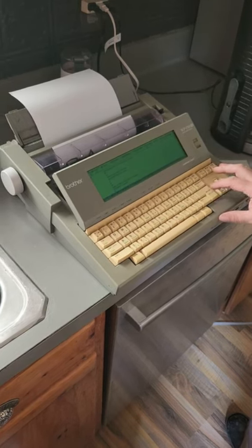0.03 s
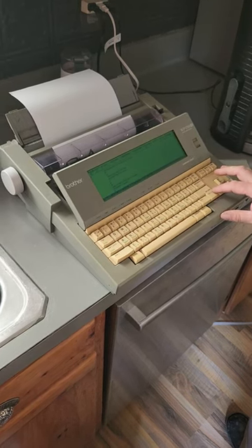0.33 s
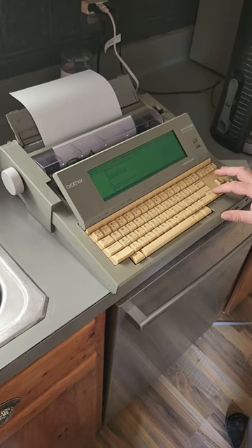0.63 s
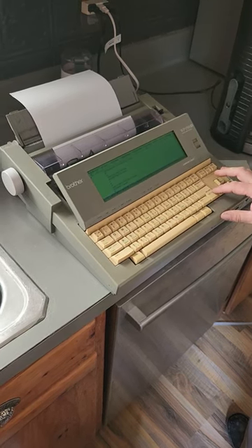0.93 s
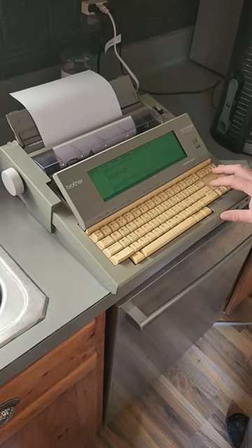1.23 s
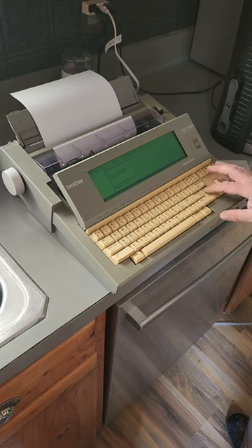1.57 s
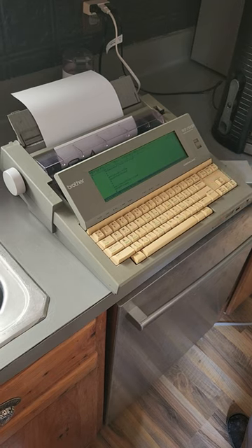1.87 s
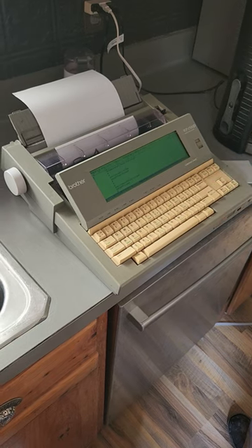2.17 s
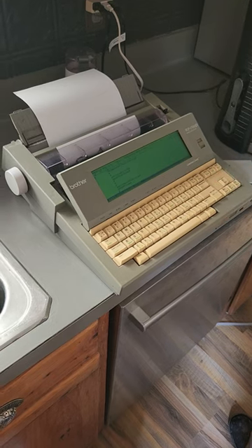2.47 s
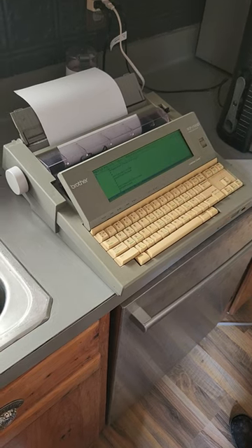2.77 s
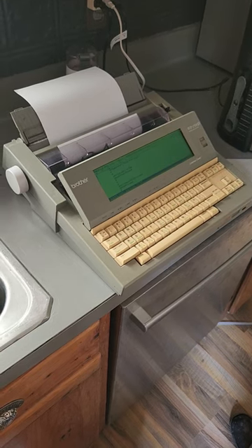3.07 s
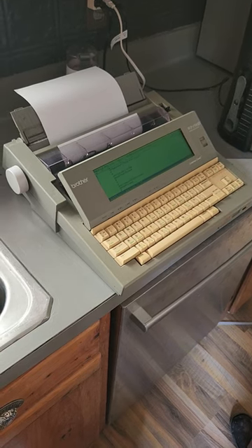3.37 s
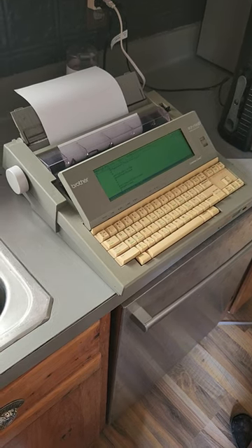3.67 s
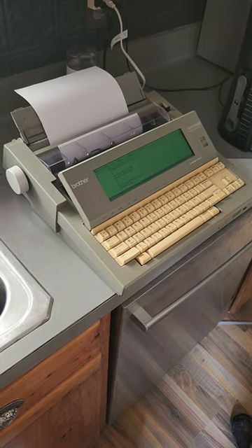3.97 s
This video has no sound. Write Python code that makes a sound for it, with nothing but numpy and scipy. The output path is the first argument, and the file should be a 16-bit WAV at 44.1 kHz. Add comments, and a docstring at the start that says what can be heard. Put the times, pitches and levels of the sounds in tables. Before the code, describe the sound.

An electronic typewriter hums quietly, then engages with a loud clunk and prints a quick run of letters, each clack mixed with small rasps and motor whirs. It is heard close by in a quiet kitchen.

```python
"""Electronic typewriter on a kitchen counter

The machine hums, clunks into action and prints about eight letters a second. The ribbon advances
with a double rasp, the hammer strikes type and roller, the type wheel whirs, and a stepper motor
moves the carriage to its next stop. Blows are decaying noise and resonant modes; rasps are runs of
tiny contacts. The small hard room adds a short tail."""
import sys
import numpy as np
from scipy import signal
from scipy.fft import rfft, irfft
from scipy.io import wavfile
from scipy.ndimage import uniform_filter1d

SR = 44100
rng = np.random.default_rng(int(sys.argv[2]) if len(sys.argv) > 2 else 0)


def bounce(signal):
    """Save signal as a 16-bit WAV file at the path given by the first command-line argument."""
    frames = np.transpose(np.atleast_2d(signal))
    limited = np.clip(frames, -1, 1)
    pcm = np.round(limited * 32767).astype(np.int16)
    wavfile.write(sys.argv[1], SR, pcm)


N = 176400

# Each row: strike in seconds, then hammer, carriage motor and carriage stop levels in relative dB.
LETTERS = [(1.7686, -35.5, -37, -43), (1.952, -36, -33, -38.5), (2.048, -38.5, -33, -40.5),
           (2.153, -38.5, -34, -40), (2.2655, -38, -34, -42), (2.3741, -37.5, -35, -39.5),
           (2.4715, -38.5, -34.5, -49), (2.5763, -36.5, -36, -39.5), (2.7127, -36.5, -34, -44),
           (2.81, -36.5, -35, -38.5), (2.9371, -37.5, -34.5, -39.5), (3.1157, -36.5, -35.5, -38.5),
           (3.251, -37, -35, -37.5), (3.3477, -36.5, -35, -36), (3.445, -37.5, -33.5, -37.5),
           (3.557, -37.5, -37, -38.5), (3.7167, -37.5, -37.5, -40.5), (3.8282, -36.5, -36, -46),
           (3.9446, -37, -35, -35.5)]
# Blows as the mechanism engages, then two dull carriage knocks just after the first letter.
# Each row: start in seconds, level in relative dB, dull knock in dB against the blow.
CLUNKS = [(1.5701, -32.5, -7), (1.5754, -18, -17.5), (1.5795, -22.5, -11), (1.6635, -31.5, 0.5),
          (1.671, -34.5, -1.5), (1.79, -54, 10), (1.799, -45.5, 5)]
# Stereo width. Each row: frequency in Hz, side against middle in dB.
WIDTH = [(50, -21.5), (130, -15.5), (250, -13.5), (440, -9), (700, 1.5), (1300, 0)]


def amp(db):
    return 10 ** (np.asarray(db) / 20)


def unit_rms(x):
    return x / np.sqrt(np.mean(x ** 2) + 1e-20)


def curve_at(points, hz):
    f, value = np.transpose(points)
    return np.interp(np.log(hz + 1), np.log(f), value)


def decay(t, t60_s):
    return np.exp(-np.log(1000) * t / t60_s)


def add(mix, start_s, sound):
    part = mix[:, max(round(start_s * SR), 0):][:, :sound.shape[1]]
    part += sound[:, :part.shape[1]]


def blow(x):
    """Scales a middle/side pair to the energy of 10 ms at level 1."""
    return x / np.sqrt(np.sum(x ** 2) / 2 / (SR / 100) + 1e-20)


def colour(x, spectrum, size=16384, smooth_bins=25):
    """Minimum-phase shaping of a middle/side pair. Each spectrum row: frequency in Hz, level in dB."""
    z, hz = rfft(x, size), np.fft.rfftfreq(size, 1 / SR)
    power = abs(uniform_filter1d(abs(z) ** 2, 2 * smooth_bins + 1))
    gain = amp(curve_at(spectrum, hz)) / np.sqrt(power + 1e-12)
    gain[1] *= amp(curve_at(WIDTH, hz))
    cepstrum = irfft(np.log(gain))
    cepstrum[:, 1:size // 2] *= 2
    cepstrum[:, size // 2 + 1:] = 0
    return irfft(z * np.exp(rfft(cepstrum)))


def decaying_noise(t60_curve, size):
    """Dense ring, each band dying at its own rate."""
    hz, t, z = signal.stft(rng.standard_normal((2, size)), SR, nperseg=128)
    z = z * decay(t, curve_at(t60_curve, hz)[:, None])
    return signal.istft(z, SR, nperseg=128)[1][:, :size]


def ring(spectrum, t60_scale=1, crack=0, size=8192):
    """One blow on a part: a dense ring with an optional opening crack."""
    # Damping of the parts. Each row: frequency in Hz, base T60 in seconds.
    body_t60 = [(200, 0.11), (600, 0.1), (1800, 0.099), (4500, 0.08), (12000, 0.041)]
    t = np.arange(size) / SR
    noise = decaying_noise([(hz, t60_s * t60_scale) for hz, t60_s in body_t60], size)
    return blow(colour(noise * (1 + crack * np.exp(-t / .0003)), spectrum))


def modes(table, size=16384):
    """Clear resonances of a part. Each row: frequency in Hz, relative dB, T60 in seconds."""
    out, t = np.zeros((2, size)), np.arange(size) / SR
    for hz, db, t60_s in table:
        gain = amp(db) * amp([[0], [curve_at(WIDTH, hz)]])
        envelope = np.minimum(2 * hz * t, 1) * decay(t, t60_s)
        out += gain * envelope * np.sin(2 * np.pi * (hz * t + rng.random((2, 1))))
    return blow(out)


def chatter(envelope, spread_db):
    """Tiny uneven contacts: noise whose level jumps every 16 samples."""
    size = len(envelope)
    noise = rng.standard_normal((2, size))
    grit_db = spread_db * rng.standard_normal(size // 16 + 1).repeat(16)[:size]
    return envelope * noise * amp(grit_db)


def hum():
    """Transformer and motor lines and thin whines waver over a soft hiss; one line swells."""
    # Hum and whine lines. Each row: frequency in Hz, level in dB.
    lines = [(48.6, -49), (120, -52.5), (124.5, -58), (148.2, -55.5), (240, -58), (254, -58.5),
             (360, -57.5), (480, -60), (569.1, -64.5), (600, -66), (808.8, -66), (1080, -69.5),
             (1259, -66.5), (3058, -80.5), (3661, -83), (4560, -79.5), (10977, -89)]
    # Room and machine hiss. Each row: frequency in Hz, density in relative dB.
    hiss_spectrum = [(22, -21), (42, 1.5), (78, -10.5), (125, -3.5), (195, -16), (260, -12.5), (390, -11.5),
                     (520, -17), (950, -22.5), (1250, -23.5), (1700, -27), (2200, -29), (2650, -40),
                     (4200, -38.5), (4600, -47.5), (5200, -45), (7200, -44.5), (8150, -38), (9200, -48),
                     (10000, -73), (12000, -59), (16000, -61)]
    t, bins_hz = np.arange(N) / SR, np.fft.rfftfreq(N, 1 / SR)
    swell_hz, swell_db = 1141, np.interp(t, [0, .9, 1.4, 1.7], [-75, -71, -61, -65])
    noise = rfft(rng.standard_normal((2, N)))
    noise[1] *= amp(curve_at(WIDTH, bins_hz))
    out = amp(-51.5) * unit_rms(irfft(noise * amp(curve_at(hiss_spectrum, bins_hz)), N))
    for hz, db in lines + [(swell_hz, swell_db)]:
        knots = rng.standard_normal((2, 40)) + 1j * rng.standard_normal((2, 40))
        waver = 1 + .21 * signal.resample(knots, N, axis=1)
        tone = waver * np.exp(2j * np.pi * (hz * t + rng.random()))
        spread = np.array([[1], [1j * amp(curve_at(WIDTH, hz))]])
        out += np.sqrt(2) * amp(db) * (spread * tone).real
    return out


def kitchen(x):
    """Hard walls return a short diffuse tail, narrow in the bass."""
    # Room decay. Each row: frequency in Hz, T60 in seconds.
    room_t60 = [(100, 1), (500, 1), (2000, 0.69), (6000, 0.52), (15000, 0.21)]
    size, build_s = 16384, .0045
    tail = decaying_noise(room_t60, size) * np.minimum(np.arange(size) / SR / build_s, 1)
    tail = colour(tail, [(250, -9), (500, -2.5), (1500, -1), (5000, -5), (15000, -4.5)])
    return signal.fftconvolve(x[:1], tail / np.linalg.norm(tail[0]), axes=1)[:, :N]


def slides():
    """Sliding parts: a rattle that swells and fades."""
    # Each row: start, rise and fall in seconds, level in dB.
    moves = [(1.585, 0.012, .14, -36), (2.715, 0.055, 0.13, -37)]
    # Rattle colour. Each row: frequency in Hz, density in relative dB.
    spectrum = [(150, 10), (500, -5), (1500, -3), (3000, -5), (4400, -3.5), (5000, -5), (5600, 3.0),
                (6600, -15), (8500, -8.5), (10200, -15), (12500, -8.0), (15500, -17)]
    out = np.zeros((2, N))
    for start_s, rise_s, fall_s, db in moves:
        t = np.arange(0, rise_s + fall_s, 1 / SR)
        envelope = np.interp(t, [0, rise_s, rise_s + fall_s], [0, 1, 0])
        rattle = colour(chatter(envelope, spread_db=.5), spectrum)
        add(out, start_s, amp(db) * rattle * np.sqrt(np.sum(envelope ** 2) / np.sum(rattle ** 2)))
    return out


def case_ring():
    """Only hard blows make the case ring."""
    # Case resonances. Each row: frequency in Hz, relative dB, T60 in seconds.
    case_modes = [(418, -11.5, 0.069), (1580, -23, .06), (1865, 0, 0.072), (4050, -0.5, 0.055),
                  (4360, 1.5, 0.023), (7070, -24, 0.099), (7360, -15, 0.073), (7770, -4, .06)]
    out, threshold_db = np.zeros((2, N)), -28
    for start_s, db, _ in CLUNKS:
        if db > threshold_db:
            add(out, start_s, amp(db - 6.5) * modes(case_modes))
    return out


def clunk():
    """The mechanism snaps in, hits its stops and rocks the case; the carriage then knocks twice."""
    # Colours of the case and the dull knock. Each row: frequency in Hz, density in relative dB.
    case_spectrum = [(150, -11), (300, -38), (420, -3.5), (750, -6), (1400, -5.5), (1880, -1), (2700, -6.5),
                     (3600, -5.5), (4150, -2), (5200, -8), (6700, -6.5), (7700, -3), (9500, -11),
                     (15500, -16)]
    knock_spectrum = [(150, -16), (420, 5), (650, 0), (950, -1.5), (1500, -17), (6000, -35)]
    # Low case thuds. Each row: start in seconds, relative dB, pitch in Hz, T60 in seconds.
    thuds = [(1.607, -26.5, 44, .15), (1.692, -33, 160, .1), (1.719, -27, 170, .07), (1.727, -26, 235, .06)]
    out, t = np.zeros((2, N)), np.arange(SR // 2) / SR
    for start_s, db, knock_db in CLUNKS:
        snap = ring(case_spectrum, t60_scale=.82, crack=.24)
        add(out, start_s, amp(db) * (snap + amp(knock_db) * ring(knock_spectrum)))
    for start_s, db, hz, t60_s in thuds:
        thud = (1 - np.exp(-t / .00068)) * decay(t, t60_s) * np.sin(2 * np.pi * hz * t)
        add(out[:1], start_s, amp(db) * thud[None])  # middle only
    return out


def type_wheel():
    """The wheel whirs round to the next letter."""
    # Whir colour. Each row: frequency in Hz, density in relative dB.
    spectrum = [(100, 7.5), (500, 4.5), (850, 1), (1300, -5), (2200, -10.5), (3000, -13.5), (4500, -18.5),
                (8000, -19.5), (10200, -27), (13000, -24), (16000, -25)]
    delay_s, spin_s = .013, .062
    out, t = np.zeros((2, N)), np.arange(0, spin_s, 1 / SR)
    envelope = abs(np.sin(np.pi * t / spin_s)) ** .44
    for strike_s, *_ in LETTERS:
        whir = blow(colour(chatter(envelope, spread_db=2), spectrum))
        add(out, strike_s + delay_s, amp(-37) * whir)
    return out


def carriage():
    """A stepper motor hums up in pitch; the carriage rocks the case, knocks to a stop and settles."""
    # Colours of the stop and the motor. Each row: frequency in Hz, density in relative dB.
    stop_spectrum = [(120, -2), (300, -2), (560, -2), (950, -22), (1200, -6.5), (1350, -9), (1530, -3),
                     (1800, -10), (2800, -22), (6000, -28), (15000, -58.5)]
    motor_spectrum = [(30, 0), (70, 8), (230, 3), (560, -1.5), (800, -35), (2000, -15), (6000, -51)]
    sway_at_s, motor_at_s, stop_at_s, settle_at_s = .0177, .030, .044, .053
    run_s, step_hz, sway_hz, jitter_s = .028, 225, 74.2, .002
    out, t = np.zeros((2, N)), np.arange(0, run_s, 1 / SR)
    swell = abs(np.sin(np.pi * t / run_s)) ** .5
    glide = 1 + .18 * (t / run_s - .5)
    stop, frame = ring(stop_spectrum), ring(motor_spectrum, t60_scale=.57)
    for strike_s, _, motor_db, stop_db in LETTERS:
        cycles = np.cumsum(step_hz * (1 + .02 * rng.standard_normal()) * glide) / SR
        kicks = np.diff(np.floor(cycles), prepend=0) * swell * rng.standard_normal(len(t))
        steps = blow(signal.fftconvolve(frame, kicks[None]))
        tone = np.sin(2 * np.pi * cycles) + amp(-13) * np.sin(2 * np.pi * (2 * cycles + rng.random()))
        add(out, strike_s + motor_at_s, amp(motor_db - 5) * steps)
        add(out, strike_s + motor_at_s, amp(motor_db + 1.8) * blow(amp([[0], [-15]]) * swell * tone))
        add(out, strike_s + sway_at_s, amp(motor_db - 6) * modes([(sway_hz, 0, .25)]))
        add(out, strike_s + rng.normal(stop_at_s, jitter_s), amp(stop_db) * stop)
        settle_s = strike_s + rng.normal(settle_at_s, jitter_s)
        add(out, settle_s, amp(stop_db - 3) * ring(stop_spectrum, t60_scale=.5))
    return out


def ribbon():
    """Ahead of each letter but the first, the feed rasps forward and springs back in tiny ticks."""
    # Forward and return strokes. Each row: delay, rise, hold and fall in seconds, relative dB.
    strokes = [(0, 0.0009, 0.0078, 0.0066, -39), (.015, .003, 0.0084, 0.0068, -43)]
    # Their colours. Each row: frequency in Hz, density in relative dB.
    forward_spectrum = [(150, -20), (700, -13), (1500, -1.5), (3000, -8), (4500, -1), (5400, -4), (6600, 0),
                        (8700, -5), (10200, -14), (12500, -2), (15500, -7)]
    return_spectrum = [(1000, 0), (3000, 0), (4500, 3.5), (6000, -5), (8500, 1.5), (10200, -9), (12500, 1),
                       (15500, -2)]
    lead_s, next_letter_s = .0515, 4.046
    out, t = np.zeros((2, N)), np.arange(SR // 10) / SR
    for strike_s in [row[0] for row in LETTERS[1:]] + [next_letter_s]:
        for stroke, spectrum in zip(strokes, (forward_spectrum, return_spectrum)):
            delay_s, rise_s, hold_s, fall_s, db = stroke
            envelope = np.minimum(t / rise_s, 1) * np.exp(-np.maximum(t - hold_s, 0) / fall_s)
            ticks = blow(colour(chatter(envelope, spread_db=4), spectrum, smooth_bins=60))
            add(out, strike_s - lead_s + delay_s, amp(db + rng.standard_normal()) * ticks)
    return out


def hammer():
    """The hammer slaps a type petal, the roller knocks, the hammer rebounds with a knock and rattle."""
    # Colours of hammer and roller. Each row: frequency in Hz, density in relative dB.
    hammer_spectrum = [(200, 10), (1200, -30), (2200, 2), (2800, -4.5), (3600, 4.5), (4400, -7), (5000, 0),
                       (5600, -1.5), (7000, -11.5), (8500, -13), (10200, -16.5), (12200, -1.5),
                       (15500, -25)]
    roller_spectrum = [(150, -8.5), (260, 0.5), (380, 0.5), (560, 2), (800, -16.5), (1200, -11),
                       (1700, -8.5), (2300, -11.5), (3000, -24), (5500, -22.5), (15000, -34)]
    # Petal and roller resonances. Each row: frequency in Hz, relative dB, T60 in seconds.
    petal_modes = [(3460, -6, 0.035), (4364, 3, 0.016), (5365, -5, 0.038)]
    roller_modes = [(351.4, 1.5, 0.041), (560, -2, 0.039), (1195, -12, 0.09)]
    knock_at_s, rebound_at_s, rattle_s, detune = .001697, .0098, .0036, .0055
    out, t = np.zeros((2, N)), np.arange(SR // 20) / SR
    slap = ring(hammer_spectrum, t60_scale=.98, crack=.1)
    tip_spectrum = [(2500, -25), (4000, 7), (7000, -9), (10000, -4), (12500, -8), (16000, -9)]
    tip = ring(tip_spectrum, t60_scale=.55)
    knock = ring(roller_spectrum, t60_scale=.63) + modes(roller_modes)
    rattle_envelope = np.exp(-((t - rebound_at_s) / rattle_s) ** 2)
    for strike_s, db, *_ in LETTERS:
        # Each letter rings a little differently.
        petal = modes([(hz * rng.normal(1, detune), level, t60_s) for hz, level, t60_s in petal_modes])
        rattle = blow(colour(chatter(rattle_envelope, spread_db=4.5), hammer_spectrum))
        strike = slap + petal + amp(-2) * tip + amp(-3) * ring(hammer_spectrum) + amp(-2.5) * rattle
        add(out, strike_s, amp(db - 5) * strike)
        add(out, strike_s + knock_at_s, amp(db - 1) * (knock + amp(-3.5) * ring(roller_spectrum)))
        rebound = knock + amp(-13.5) * petal
        add(out, strike_s + rebound_at_s * rng.normal(1, .07), amp(db - 1.5) * rebound)
    return out


def scene():
    """Machine, room tail and hum, mixed as middle/side and returned as left/right."""
    machine = amp(-3.5) * (clunk() + ribbon() + hammer() + carriage() + type_wheel()) + slides()
    middle, side = machine + case_ring() + amp(-6.5) * kitchen(machine) + hum()
    return np.array([middle + side, middle - side])


def record(dry):
    """Steep low-pass on the top treble."""
    cutoff_hz = 16150
    lowpass = signal.firwin(301, cutoff_hz, window=("kaiser", 9), fs=SR)
    return signal.oaconvolve(dry, lowpass[None], "same")


dry = scene()
out = record(dry)
bounce(out)
```